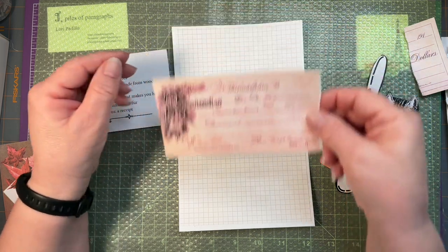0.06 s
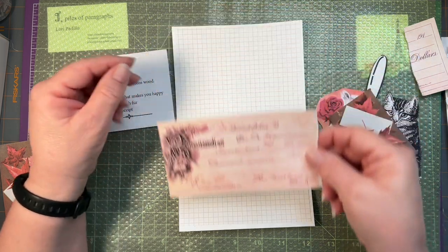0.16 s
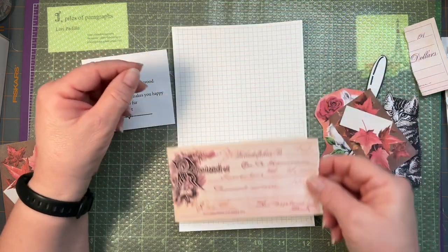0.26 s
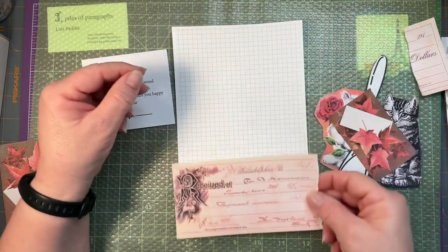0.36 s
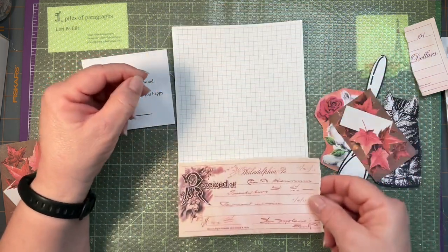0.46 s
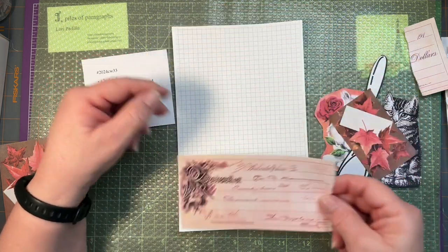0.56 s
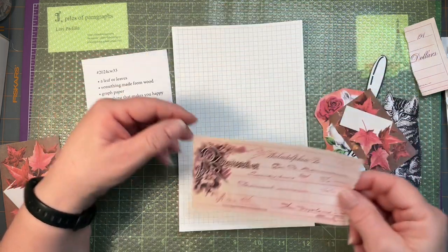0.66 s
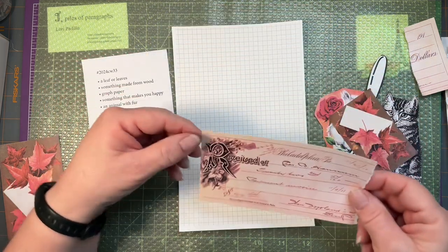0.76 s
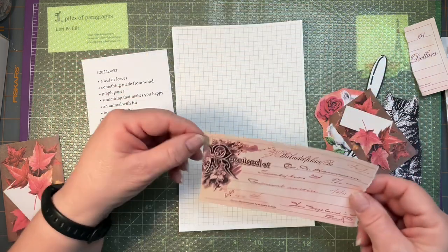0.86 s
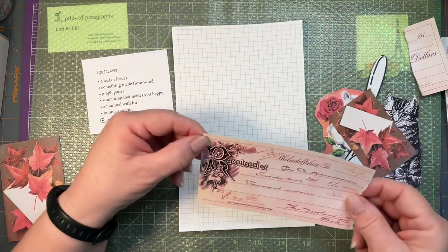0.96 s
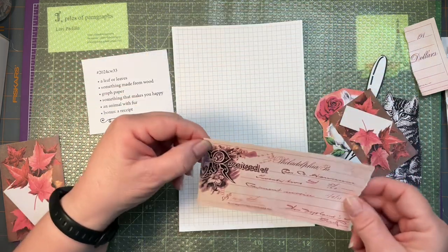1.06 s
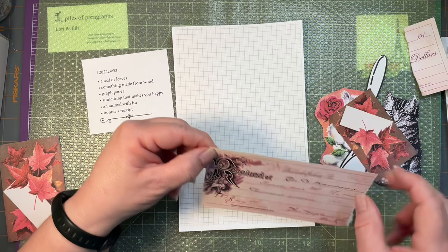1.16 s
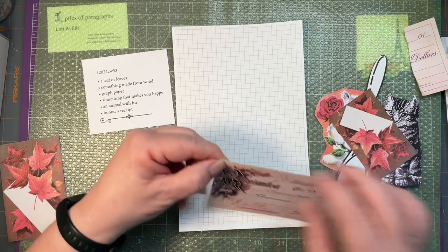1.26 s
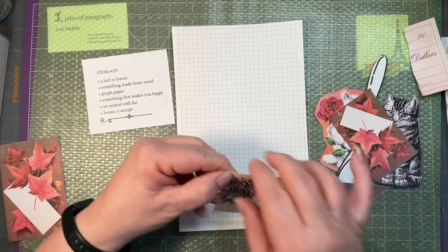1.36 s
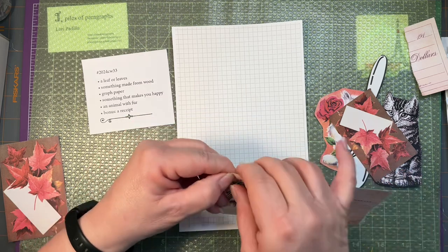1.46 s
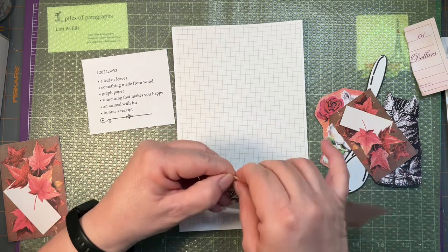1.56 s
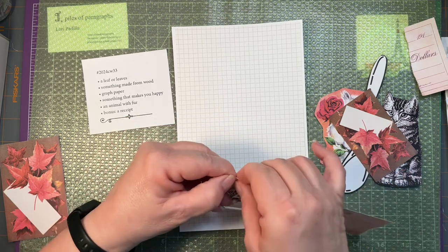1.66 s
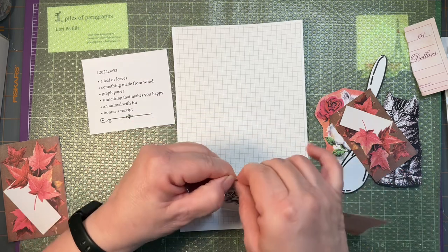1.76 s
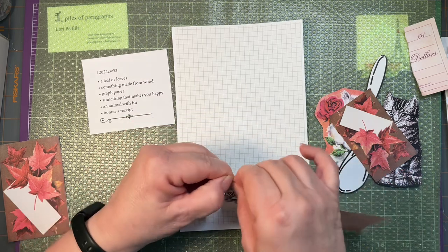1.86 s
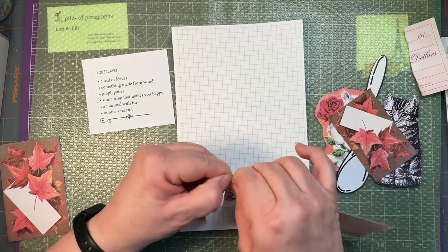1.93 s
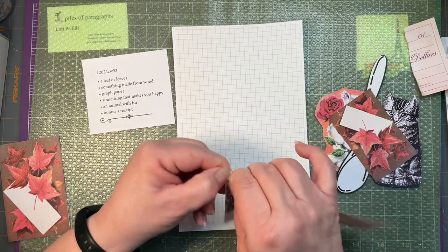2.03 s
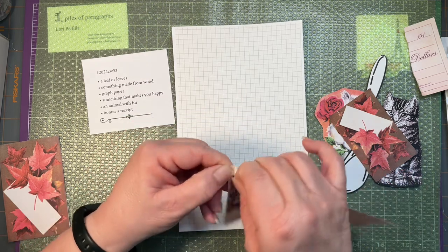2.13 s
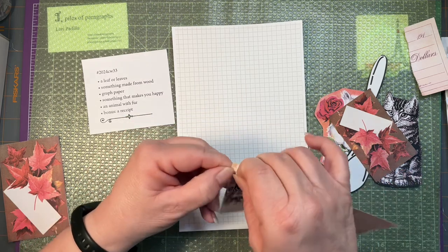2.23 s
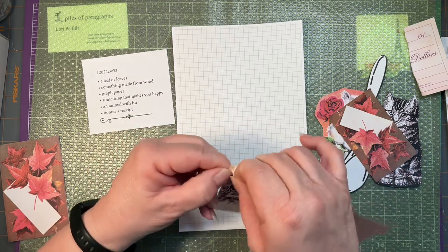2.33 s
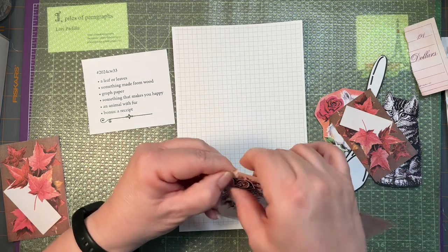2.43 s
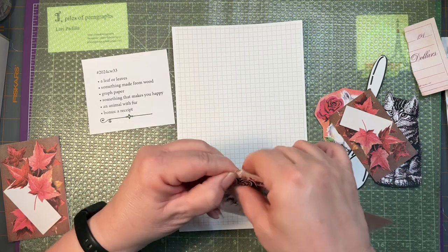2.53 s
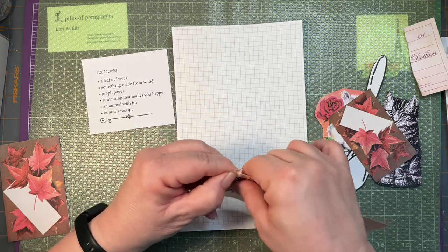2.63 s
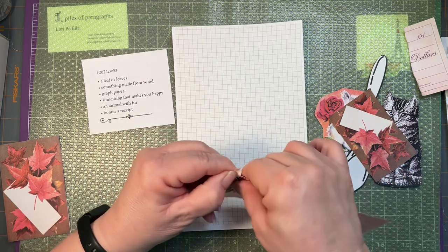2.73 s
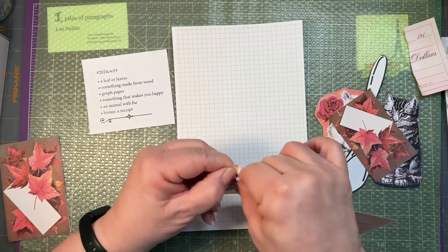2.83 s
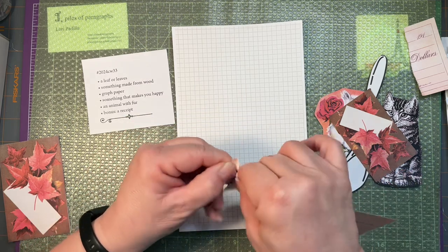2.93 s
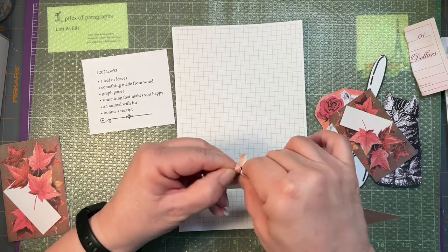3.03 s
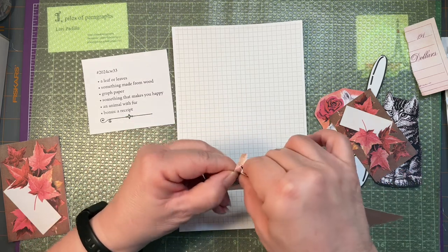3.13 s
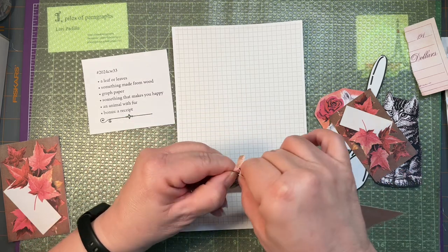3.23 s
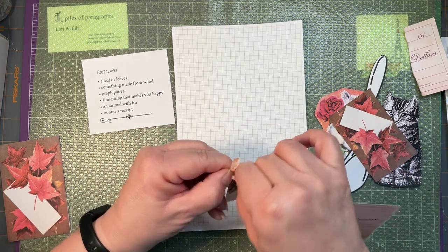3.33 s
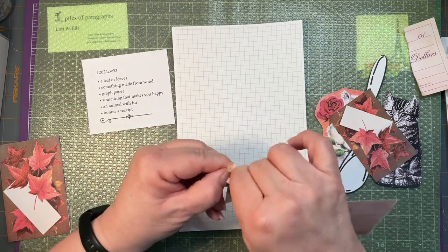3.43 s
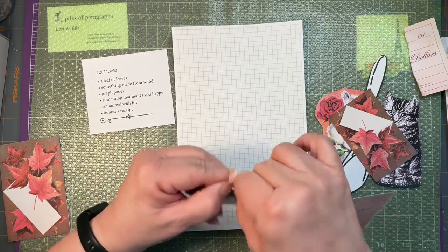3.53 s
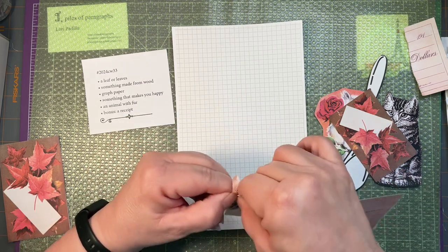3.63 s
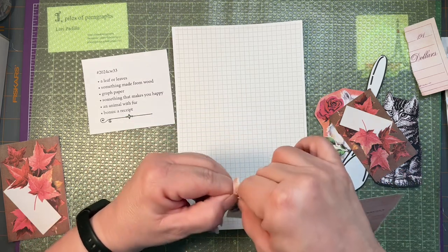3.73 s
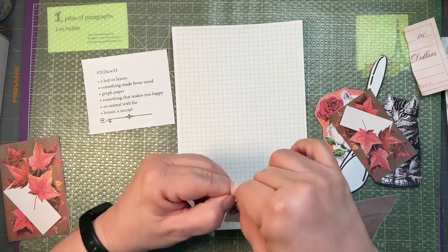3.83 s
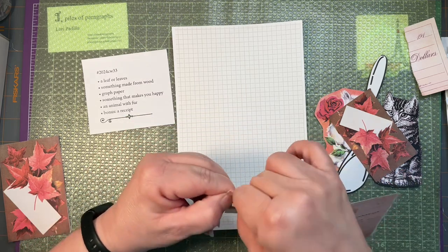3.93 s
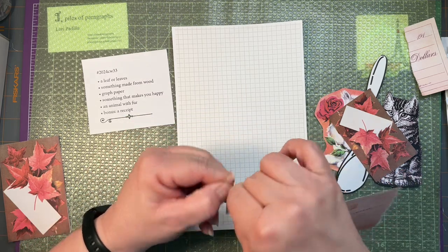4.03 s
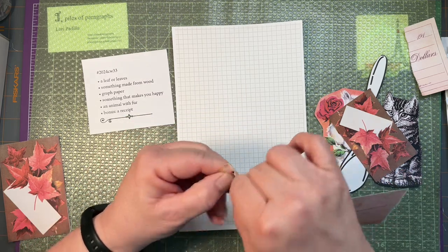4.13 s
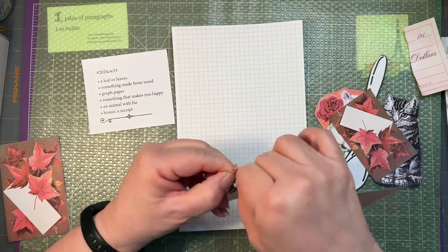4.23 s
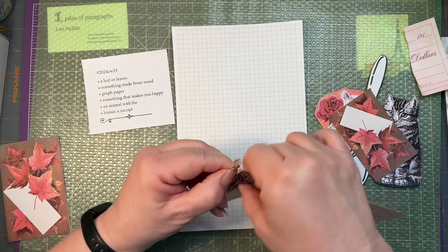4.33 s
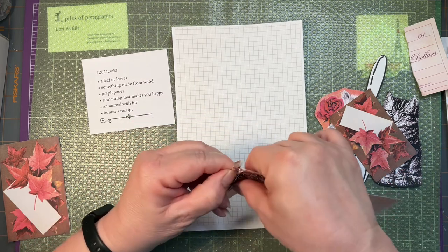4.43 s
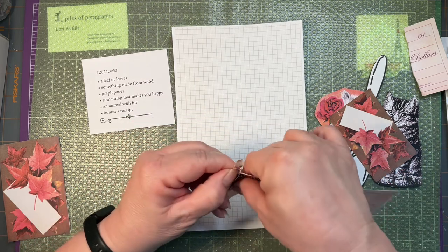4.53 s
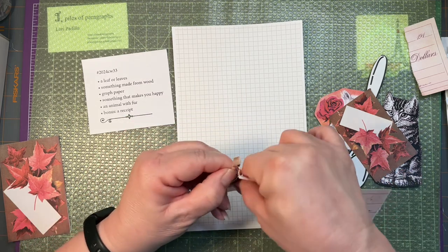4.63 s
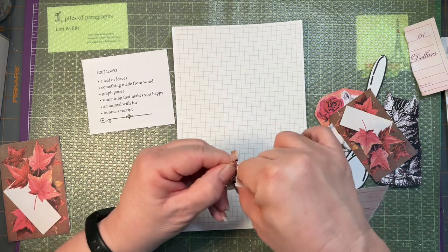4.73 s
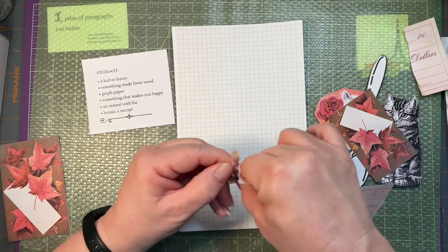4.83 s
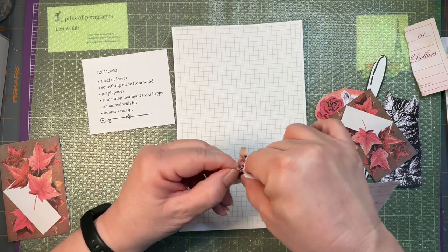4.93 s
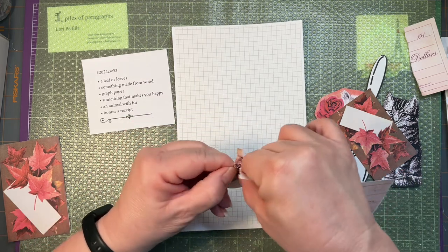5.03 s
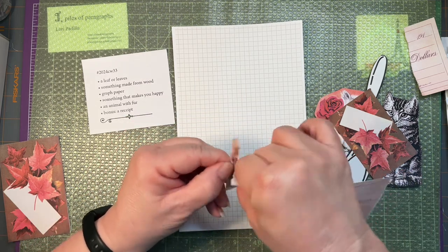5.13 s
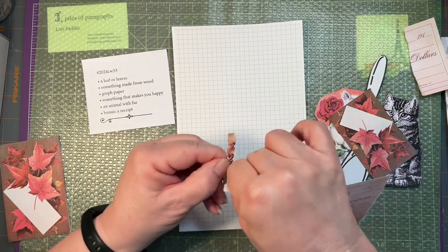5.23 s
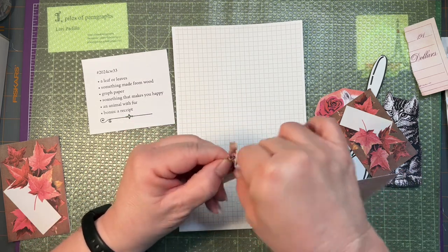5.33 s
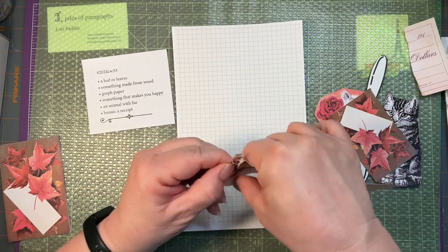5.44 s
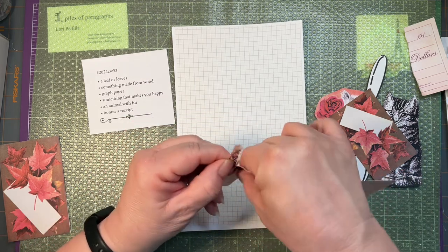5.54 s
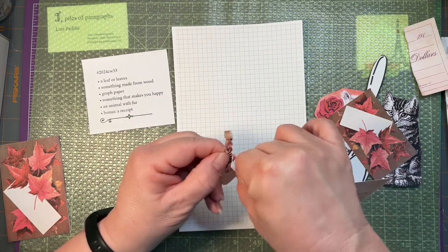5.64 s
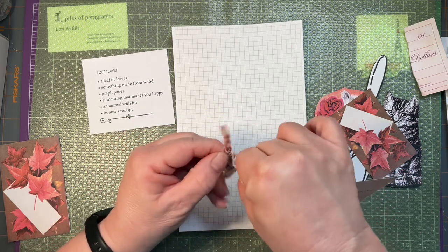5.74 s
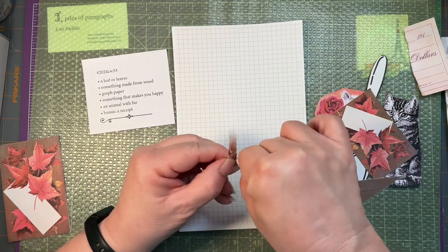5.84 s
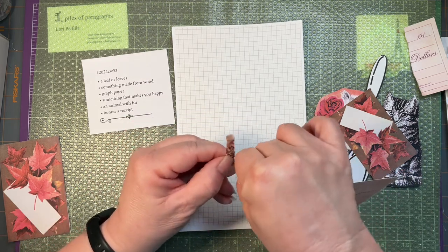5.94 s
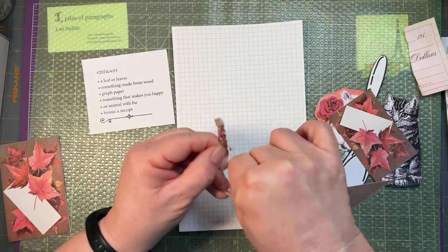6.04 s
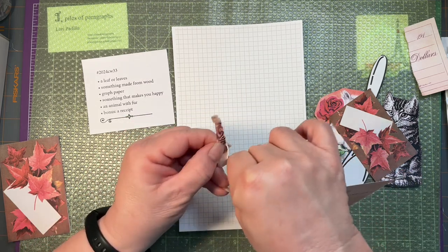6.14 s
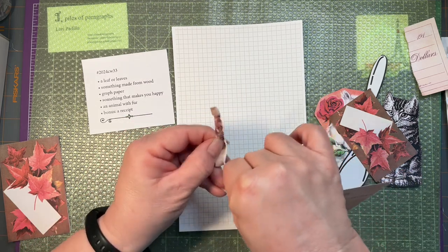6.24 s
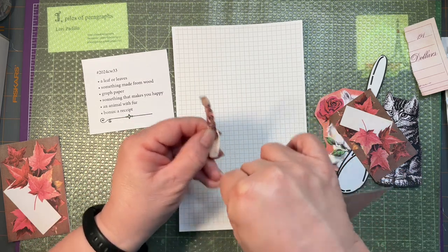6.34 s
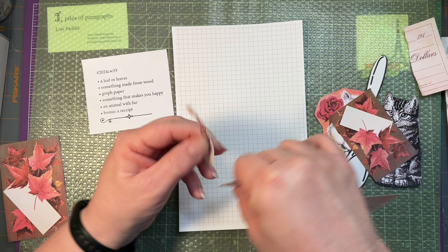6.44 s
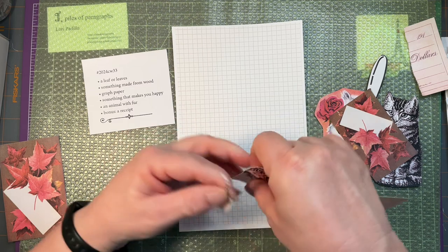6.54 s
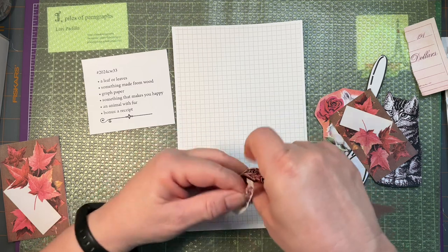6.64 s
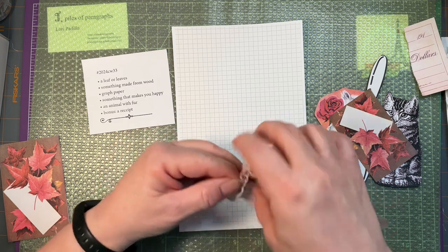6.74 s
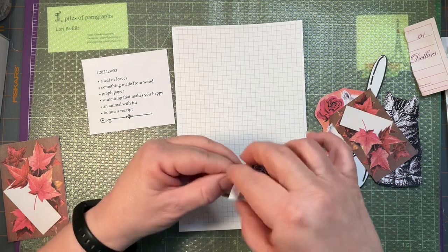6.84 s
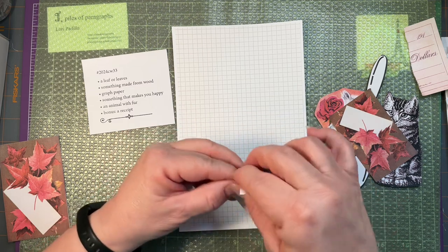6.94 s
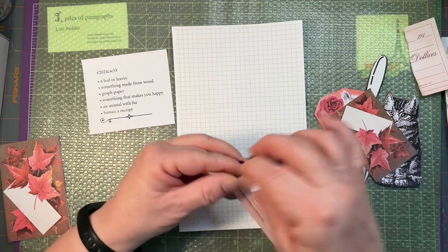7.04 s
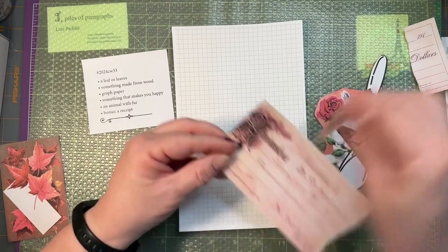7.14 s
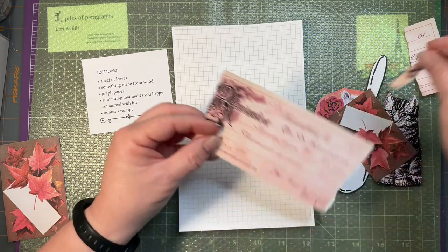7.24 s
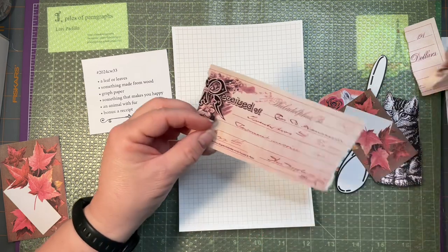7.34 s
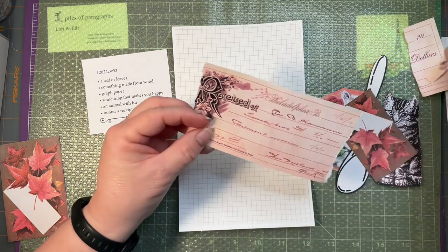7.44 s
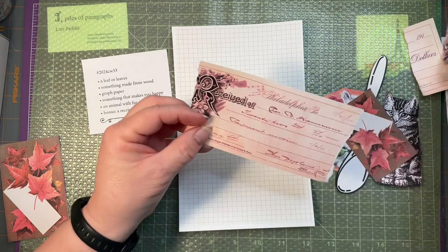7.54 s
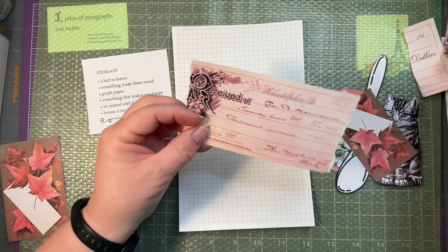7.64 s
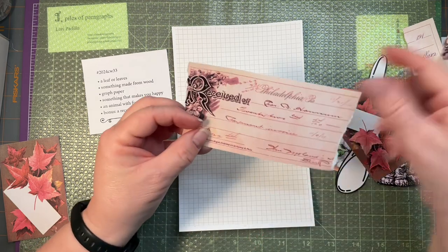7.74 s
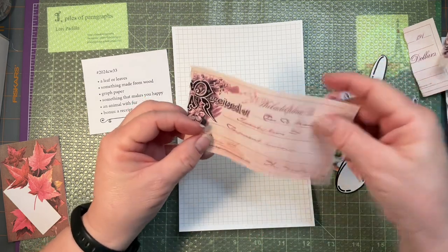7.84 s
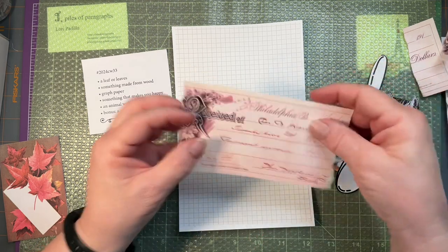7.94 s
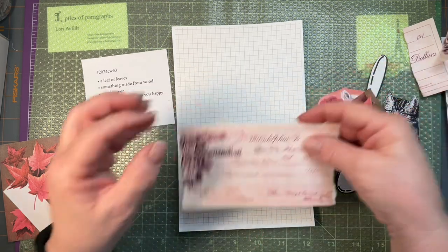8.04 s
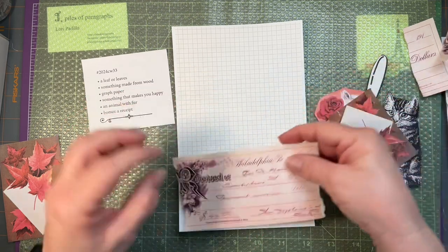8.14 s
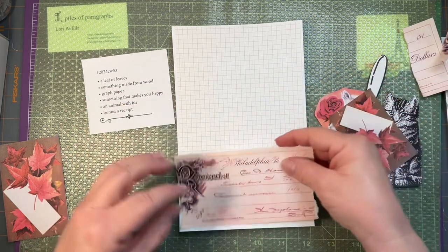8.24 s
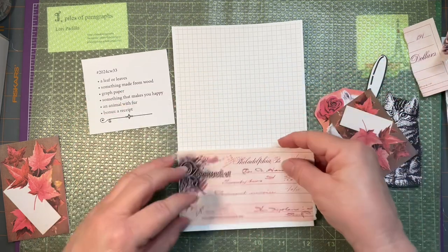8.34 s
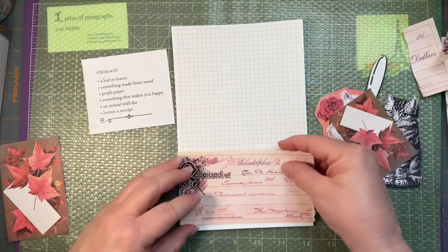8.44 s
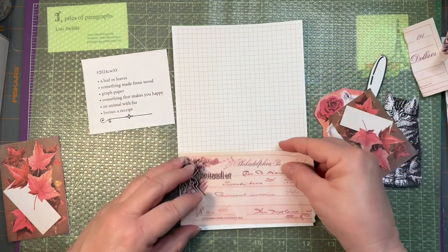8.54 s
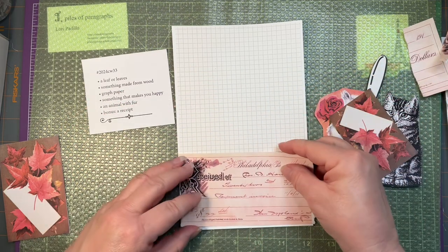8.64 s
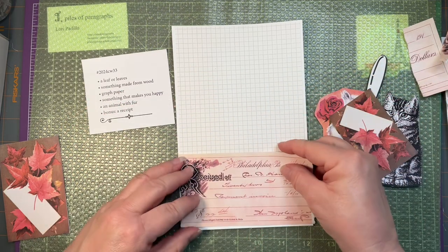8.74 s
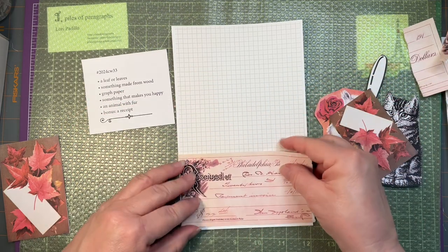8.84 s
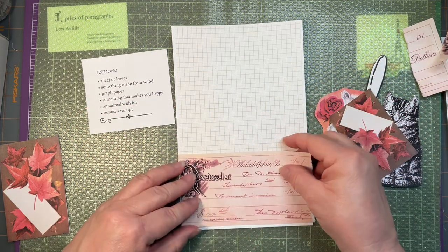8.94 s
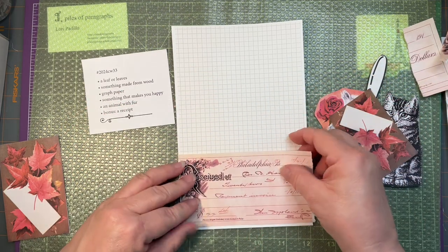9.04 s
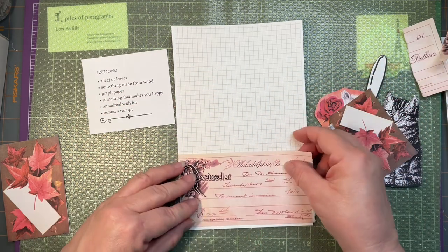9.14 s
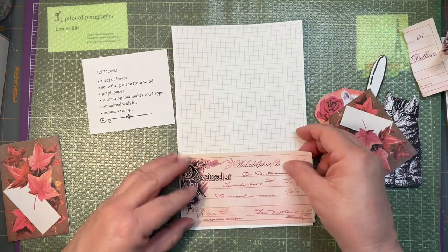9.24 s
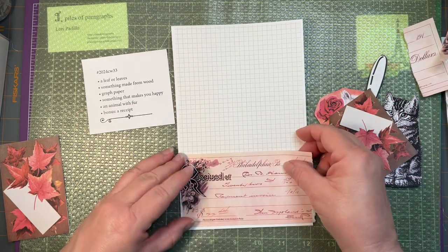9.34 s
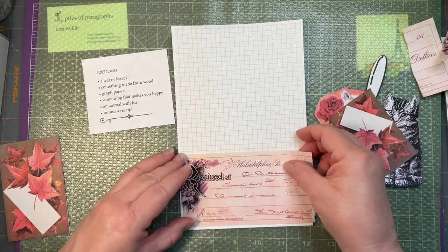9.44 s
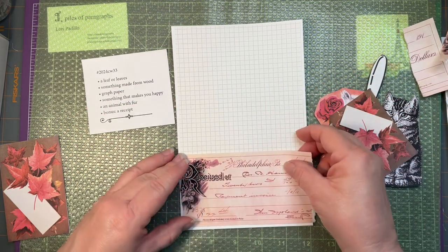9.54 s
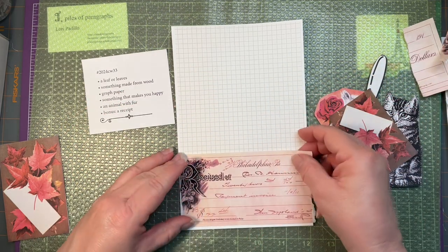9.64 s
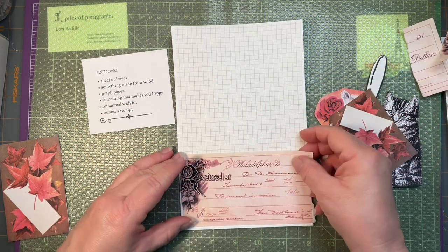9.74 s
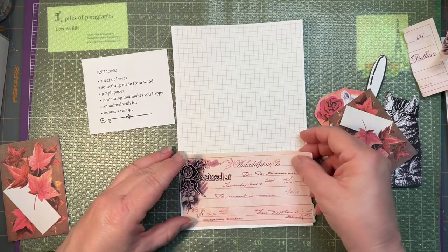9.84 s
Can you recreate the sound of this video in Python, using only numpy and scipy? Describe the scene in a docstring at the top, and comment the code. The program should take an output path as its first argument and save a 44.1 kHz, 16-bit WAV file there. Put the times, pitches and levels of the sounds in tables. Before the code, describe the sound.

Paper is torn by hand in short, crackling rips, then rustles as it is laid down, over a faint room hum.

```python
"""Tearing paper at a craft table

Close to the microphone, a little above the table, a slip of paper is torn by hand in short pulls,
then laid down and slid into place. Fibres break in clumps of tiny clicks, creases snap, skin and
paper rub; all of it rings briefly in the sheet's modes. Behind it, somewhere in the quiet room,
two motors hum out of step."""
import sys
import numpy as np
from scipy import signal
from scipy.fft import rfft, irfft
from scipy.io import wavfile

SR = 44100
rng = np.random.default_rng(int(sys.argv[2]) if len(sys.argv) > 2 else 0)


def generate_wav(sig):
    """Save sig (samples, or channels by samples) to the path in sys.argv[1] as 16-bit PCM at SR."""
    pcm = np.round(np.clip(np.atleast_2d(sig).T, -1, 1) * 32767).astype(np.int16)
    wavfile.write(sys.argv[1], SR, pcm)


N = 436149

# Each pull, rub or slide: (start [s], length [s], crackle at start [dB], crackle at end [dB],
# flexing over crackle [dB], finest fibres over crackle [dB], pitch of the patch between the fingers [Hz])
HAND_STROKES = [(0.0, 0.22, -73.5, -82, -4, 5, 7200), (0.16, 0.13, -71.5, -82, 3, -4, 2000),
                (0.313, 0.047, -60, -73, -3, 0, 1840), (0.371, 0.1, -70, -67, -8, -4.5, 2100),
                (0.497, 0.041, -68, -66, -7, -7, 2030), (0.552, .05, -56, -73, -5, -3.5, 2020),
                (0.7, 0.063, -90.5, -86, -8, 5, 8000), (0.767, .008, -64, -75, 7, -6, 2500),
                (0.94, 0.099, -82, -81, 3, -1, 8000), (1.067, 0.06, -62.5, -65, 2.5, 0, 2400),
                (1.358, 0.028, -66, -83, 2.5, -6, 2900), (1.449, 0.16, -64.5, -73.5, 0, -8, 2720),
                (1.633, 0.018, -50, -54.5, 1, -9, 2200), (1.673, 0.016, -67, -61.5, 3, -12, 5000),
                (1.716, 0.056, -60, -65.5, 5.5, -11, 2270), (1.793, 0.055, -68, -65, -4, -12, 2470),
                (1.866, 0.12, -50, -47, -1, -3.5, 2780), (2.014, 0.074, -64, -59.5, 11, 1, 2130),
                (2.133, 0.18, -56.5, -72.5, -3.5, -9, 2100), (2.367, 0.068, -64, -57, -1.5, 1, 3660),
                (2.488, 0.027, -74, -66.5, 0.5, -5, 2540), (2.592, 0.083, -60, -62.5, 4, -1, 1920),
                (2.698, 0.08, -73, -62, 0, 3, 4900), (2.772, .008, -44.5, -46, -7.5, 3, 5100),
                (2.806, 0.098, -52.5, -51.5, -8.5, 2, 5950), (2.923, 0.0066, -50, -43, -11, 1, 6100),
                (2.966, 0.26, -61.5, -66.5, -9, 0, 6500), (3.309, 0.14, -65.5, -63.5, 3, -5, 2760),
                (3.53, 0.059, -57, -62.5, -2, -8.5, 2260), (3.638, 0.044, -68, -64.5, -7, -7, 3840),
                (3.869, 0.064, -76, -46, -3, 0, 3000), (3.98, 0.023, -60, -58, -12, -5, 2700),
                (4.013, 0.11, -51, -58.5, -1, -4, 2550), (4.153, 0.04, -46.5, -49, -3.5, -5, 1400),
                (4.21, .035, -67, -66, -5, -8, 2800), (4.26, .066, -54, -64, -10.5, -3, 2220),
                (4.33, 0.074, -51, -63.5, -3, 0.5, 4580), (4.422, 0.11, -63, -59, -3, -5, 4960),
                (4.565, 0.072, -54, -46.5, -2, -3.5, 1450), (4.654, 0.065, -56.5, -41, -12, 7, 6100),
                (4.718, 0.029, -50, -46.5, -10.5, 3, 3680), (4.773, 0.061, -67, -73, -1.5, -4, 1990),
                (4.842, 0.11, -61, -59, -8.5, 3, 5100), (4.97, 0.071, -71, -77, -12, 1.5, 6000),
                (5.098, 0.068, -73, -34.5, -8.5, -0.5, 4450), (5.177, .03, -37.5, -58.5, -22, -1, 4540),
                (5.263, 0.056, -64.5, -58.5, -3, -0.5, 2700), (5.342, 0.047, -54, -52.5, -6, -3, 2500),
                (5.398, 0.096, -50.5, -63, -3.5, -9, 2430), (5.53, 0.037, -55, -55.5, 1, -3, 2500),
                (5.587, 0.07, -45.5, -39, -10.5, -0.5, 7500), (5.74, 0.12, -62, -58, -7, -0.5, 1860),
                (5.942, 0.063, -68.5, -39.5, -12, 6, 6430), (6.013, 0.057, -40, -43.5, -5, 0.5, 6150),
                (6.175, .012, -57, -59, -2, 0.5, 5930), (6.198, 0.056, -47, -37, -1, 2.5, 5830),
                (6.271, .04, -38.5, -43, 1.5, 1, 5800), (6.316, 0.016, -32.5, -45, -6, -10, 5960),
                (6.341, 0.021, -70, -47, -21, 7.5, 6000), (6.414, 0.017, -51, -56, -17, -18, 5400),
                (6.442, 0.15, -58.5, -58.5, -6.5, -2, 4600), (6.612, 0.074, -59, -55.5, -5, -2.5, 2290),
                (6.705, 0.062, -59, -59.5, 7.5, 1.5, 1400), (6.797, 0.15, -65, -72, 2, -3.5, 1440),
                (6.904, 0.085, -66.5, -67, 3, -2.5, 1420), (6.985, 0.088, -52.5, -67, -4.5, -3.5, 1440),
                (7.085, 0.011, -44, -67.5, -4, -7, 3670), (7.099, 0.049, -71.5, -81.5, 22, 3, 980),
                (7.157, 0.044, -71, -76, -8, 6, 2200), (7.224, 0.039, -70, -69, -6, 0.5, 3500),
                (7.395, 0.038, -62.5, -68.5, -15, -2.5, 3850), (7.498, 0.019, -68, -78.5, -25, 3, 4100),
                (7.636, 0.01, -61.5, -72, -20, -7.5, 4400), (7.794, 0.038, -58.5, -52.5, 4, -10, 2600),
                (7.837, 0.011, -36.5, -50, 10, -21, 2630), (7.869, 0.043, -51, -45.5, -10, -5, 2650),
                (7.937, .008, -52, -49, 11, -12, 2650), (7.955, 0.0096, -50, -56, 7, -11, 2620),
                (7.995, 0.14, -64, -81, -1.5, -0.5, 600), (8.139, 0.13, -62.5, -65.5, 0, -5.5, 2400),
                (8.311, 0.024, -64.5, -55.5, -6.5, -8, 3700), (8.37, 0.1, -59, -55, -13, -9, 4780),
                (8.528, 0.028, -58, -61.5, -24, -10, 3630), (8.603, 0.096, -53, -74, -13.5, -5, 3650),
                (8.732, 0.016, -60.5, -63.5, -12, -8, 3900), (8.79, .1, -65.5, -53.5, -16, -3.5, 3540),
                (8.903, .12, -56.5, -63.5, -17, -3, 3600), (9.046, 0.082, -54, -56, -19, 0, 3600),
                (9.182, 0.07, -60.5, -70.5, -16, 3, 3630), (9.302, 0.0049, -70, -65, -17, 1, 4600),
                (9.548, 0.097, -57, -59.5, -30.5, 2, 6070), (9.664, 0.039, -60.5, -58.5, -33, -3.5, 6100),
                (9.739, 0.03, -70.5, -79.5, -20, 4, 7000)]
# Creases snapping: (time [s], level [dB], flexing over that level [dB], pitch of the popping patch [Hz])
CREASE_SNAPS = [(0.31, -41.5, -4, 1710), (0.52, -50, -6, 1910), (1.491, -44.5, -7, 2370),
                (1.523, -51, -17, 1000), (1.585, -42.5, -8.5, 880), (1.599, -50, -3, 1500),
                (1.63, -41, -10.5, 2250), (1.657, -36.5, -4.5, 875), (1.711, -36.5, -10, 830),
                (1.81, -46.5, -2, 2300), (1.83, -39, -2.5, 2280), (1.86, -38, -17, 790),
                (1.874, -27, -15.5, 845), (2.04, -30, -14, 2100), (2.067, -47.5, 13, 475),
                (2.242, -37, -9.5, 2220), (2.434, -30.5, -9.5, 1034), (2.727, -38.5, -20, 1120),
                (2.75, -38, -17, 960), (2.772, -25.5, -16.5, 855), (2.806, -25, -20, 930),
                (2.82, -21, -14, 2210), (2.854, -25.5, -14.5, 2190), (2.93, -25, -34, 2520),
                (2.979, -32.5, -18.5, 910), (3.15, -38, -19.5, 1140), (3.406, -38.5, -4.5, 880),
                (3.418, -24.5, -15.5, 780), (3.737, -58, 3, 1930), (3.801, -45.5, -32, 2520),
                (3.909, -29.5, -10.5, 2030), (3.999, -34, -27, 2020), (4.019, -29, -16, 880),
                (4.096, -29, -15, 1600), (4.16, -27.5, -15, 2110), (4.313, -30, -2.5, 805),
                (4.573, -41, -9, 1600), (4.624, -31.5, -7, 1490), (4.632, -34, -8, 1430),
                (4.672, -24, -22, 1870), (4.687, -25.5, -26.5, 1970), (4.697, -28, -26, 2300),
                (4.708, -16.5, -42, 2250), (4.724, -30.5, -10.5, 1550), (4.738, -25, -25, 2180),
                (4.846, -29.5, -20, 2000), (5.131, -29, -27, 1960), (5.16, -24.5, -3, 914),
                (5.4, -26, -8, 1100), (5.536, -42, -27, 1000), (5.586, -24.5, -19.5, 1090),
                (5.759, -19.5, -15.5, 1296), (5.873, -36, -33, 2510), (5.894, -40.5, -26, 2520),
                (5.971, -42, -13, 1020), (5.982, -31.5, -18, 814), (6.016, -24, -21, 810),
                (6.192, -34, -14, 1130), (6.276, -14, -17, 930), (6.317, -4.5, -13, 545),
                (6.357, -12, -12, 797), (6.419, -25.5, -15.5, 2080), (6.472, -41, -7.5, 1090),
                (6.71, -40, 7, 1000), (6.776, -32, -12, 1670), (6.822, -51.5, 12, 1390),
                (6.896, -56.5, 22.5, 1040), (7.091, -44, 8.5, 1260), (7.398, -47, -15.5, 1940),
                (7.499, -38.5, -41, 2600), (7.787, -39.5, -19, 814), (7.802, -37.5, 3, 897),
                (7.807, -32.5, -2.5, 2700), (7.835, -8, -11.5, 720), (7.89, -32, -9.5, 1160),
                (7.918, -29, -8, 1070), (7.942, -30.5, 6.5, 927), (7.96, -28.5, -0.5, 950),
                (7.968, -34, 6, 1065), (8.525, -45, -30, 2530), (8.608, -32.5, -19, 2580),
                (8.816, -30, -16.5, 2450), (9.115, -31, -27, 2610), (9.306, -42, -18, 2310)]
# The sheet's colour while torn in the hands: (frequency [Hz], relative density [dB])
HELD_SPECTRUM = [(120, -43), (200, -14), (446, -2), (575, -4), (653, -5), (1110, 1.5), (1590, -5),
                 (1910, -3.5), (5110, -4), (5700, -8.5), (6240, -2), (9140, -14), (15500, -19)]
# Its colour while slid flat on the table: (frequency [Hz], relative density [dB])
FLAT_SPECTRUM = [(880, -22.5), (1500, -22.5), (2350, 0.5), (2830, -6), (3510, 5), (4230, -6), (5290, 4.5),
                 (5670, -21), (6500, 7), (7160, -9), (8540, -8.5), (10500, -17), (15500, -18.5)]
# The air of the room: (frequency [Hz], relative density [dB])
AIR_SPECTRUM = [(40, -8), (60, 2.5), (120, 5.5), (200, -2.5), (300, -16.5), (500, -21), (1300, -28),
                (3000, -30.5), (6500, -35), (8200, -33), (9500, -42), (15800, -37.5)]
# The motors' tones: (frequency [Hz])
MOTOR_HZ = [55.25, 58.775, 110.5, 114.03, 117.55, 119.96, 169.29, 176.33]
# The same tones ahead of the microphone's bass cut: (rms level [dB])
MOTOR_DB = [-66.5, -67.5, -82.5, -79, -67, -79.5, -80, -79]

LAID_DOWN_S = 8.1
FLEX_TOP_HZ, FINE_FROM_HZ = 2100, 7800   # three zones: flexing, crackle, finest fibres
PATCH_DB, PATCH_OCTAVES = 7, 0.33   # the free patch rings loudest: lift and half width
CRACK_DECAY_S, FLAP_DECAY_S = 0.003, 0.0027


def from_db(db):
    """Decibels to gain."""
    return 10 ** (np.asarray(db) / 20)


def unit_rms(x):
    """Scale to unit rms."""
    return x / np.sqrt(np.mean(x ** 2) + 1e-20)


def level_at(spectrum, hz):
    """Read a spectrum's dB on a log-frequency axis."""
    points_hz, points_db = np.transpose(spectrum)
    return np.interp(np.log(hz), np.log(points_hz), points_db)


def drift(rate_hz):
    """A random wander of rms 1: coarse noise through a double one-pole low-pass."""
    step = 40
    pole = np.exp(-2 * np.pi * rate_hz * step / SR)
    noise = rng.standard_normal(N // step + 1002)
    slow = signal.lfilter([1], [1, -2 * pole, pole * pole], noise)[1000:]
    return np.interp(np.arange(N) / step, np.arange(len(slow)), unit_rms(slow))


def mode(x, hz, width_hz):
    """A resonance that turns unit white noise into unit rms."""
    radius, angle = np.exp(-np.pi * width_hz / SR), 2 * np.pi * hz / SR
    gain = np.sqrt((1 - radius ** 2) / 2)
    return signal.lfilter([gain, 0, -gain], [1, -2 * radius * np.cos(angle), radius ** 2], x)


def hand_strokes(attack_db_per_s=2499, release_db_per_s=753):
    """Strokes set in fast, run and let go; gives crackle, flexing and fine dB and the patch's octave."""
    t = np.arange(N // 32 + 2) * 32 / SR
    start_s, length_s, first_db, last_db, flex_db, fine_db, hz = np.transpose(HAND_STROKES)[:, :, None]
    db = first_db + (last_db - first_db) * np.clip((t - start_s) / length_s, 0, 1)
    db -= attack_db_per_s * np.maximum(start_s - t, 0)
    db -= release_db_per_s * np.maximum(t - start_s - length_s, 0)
    power = from_db(2 * np.maximum(db, -150))   # overlapping strokes add in power
    levels = [10 * np.log10(np.sum(power * from_db(2 * over), axis=0)) for over in (0, flex_db, fine_db)]
    patch_octave = np.sum(power * np.log2(hz), axis=0) / np.sum(power, axis=0)
    return [np.interp(np.arange(N) / SR, t, curve) for curve in levels + [patch_octave]]


def fibres(per_s, spread_db, clump_db):
    """Breaking fibres: random clicks of very uneven size that come in clumps; rms 1."""
    sizes = from_db(spread_db * np.minimum(rng.exponential(1, N), 4))
    signs = rng.choice([-1, 1], N)
    breaking = rng.random(N) < per_s / SR
    return unit_rms(sizes * signs * breaking * from_db(clump_db * drift(90)))


def sheet_modes(textures, zone_forces, zone_clicks, patch_octave, grip):
    """The sheet rings in fifty short modes, which wax and wane as the grip bends it."""
    in_hand = np.arange(N) / SR < LAID_DOWN_S
    modes_hz = np.geomspace(240, 15600, 50)
    zones = (modes_hz > FLEX_TOP_HZ).astype(int) + (modes_hz > FINE_FROM_HZ)
    # the modes of a zone share its power according to the sheet's colour
    powers = [from_db(2 * level_at(sp, modes_hz)) * modes_hz for sp in (HELD_SPECTRUM, FLAT_SPECTRUM)]
    held_share, flat_share = (np.sqrt(power / np.bincount(zones, power)[zones]) for power in powers)
    ringing = np.zeros(N)
    for k, (hz, zone) in enumerate(zip(modes_hz, zones)):
        share = np.where(in_hand, held_share[k], flat_share[k])
        lift_db = PATCH_DB * np.maximum(1 - np.abs(np.log2(hz) - patch_octave) / PATCH_OCTAVES, 0)
        bending = from_db(lift_db + 3.48 * grip * drift(12.9) - 3.5)
        drive = textures[k % 3] * zone_forces[zone] + zone_clicks[zone]
        ringing += (-1) ** k * mode(drive * share * bending, hz, width_hz=30 + 0.044 * hz)
    return ringing


def crease_snaps():
    """A crease gives a sharp click, a burst of force (crack, flap) and a hollow pop at its patch's pitch."""
    span = 2000
    t = np.arange(span) / SR
    swing = (1 - np.exp(-t / 0.00076)) * np.exp(-t / 0.0039)
    click, crack, flap, pops = np.zeros((4, N + span))
    for time_s, db, flex_db, hz in CREASE_SNAPS:
        i = round(time_s * SR)
        click[i] += from_db(db + 1)
        crack[i:i + span] += from_db(db - 16.5) * np.exp(-t / CRACK_DECAY_S)
        flap[i:i + span] += from_db(db + flex_db - 2) * np.exp(-t / FLAP_DECAY_S)
        pops[i:i + span] += from_db(db + flex_db) * swing * np.sin(2 * np.pi * hz * t)
    return click[:N], crack[:N], flap[:N], pops[:N]


def paper():
    """The slip heard close up: breaking fibres, rubbing and snaps drive the sheet's modes."""
    crackle_db, flex_db, fine_db, patch_octave = hand_strokes()
    pull = np.clip((crackle_db + 68.5) / 22, 0, 1)
    grip = np.where(np.arange(N) / SR < LAID_DOWN_S, 1, 0.45)
    # a light touch sticks and slips, so it comes in crinkles; a hard pull runs on
    crinkle = from_db(grip * (1 - pull) * (2.05 * drift(41) - 0.5))
    crackle, flex, fine = (crinkle * from_db(db) for db in (crackle_db, flex_db, fine_db))
    click, crack, flap, pops = crease_snaps()
    zone_forces = [flex + flap, crackle + crack, fine + from_db(-5.5) * crack]
    zone_clicks = [0, click, from_db(-14) * click]
    fibre_share = grip * (0.42 + 0.34 * pull)
    breaks = np.sqrt(fibre_share) * fibres(per_s=2200, spread_db=4, clump_db=4)
    rubbing = np.sqrt(1 - fibre_share) * rng.standard_normal((3, N))
    textures = breaks + rubbing
    air_puff = from_db(-23.5) * mode(flap * (1 + 3.3 * textures[0]), hz=290, width_hz=300)
    crease_tick = from_db(-23.5) * mode(click, hz=4000, width_hz=7000)
    return pops + air_puff + crease_tick + sheet_modes(textures, zone_forces, zone_clicks, patch_octave, grip)


def reflections(x, t60_s=0.068, level_db=-15, top_hz=5000):
    """Table and walls return a short dull tail, 4 ms behind the direct sound."""
    t = np.arange(SR // 2) / SR
    tail = rng.standard_normal(len(t)) * from_db(-60 * t / t60_s) * (t > 0.004)
    tail = signal.sosfilt(signal.butter(1, top_hz, fs=SR, output="sos"), tail)
    tail /= np.sqrt(np.sum(tail ** 2))
    return from_db(level_db) * signal.fftconvolve(x, tail)[:N]


def room_air(level_db=-62.5):
    """Steady air noise all round the microphone, mostly bass."""
    hz = np.maximum(np.fft.rfftfreq(N, 1 / SR), 1)
    spectrum = rfft(rng.standard_normal(N)) * from_db(level_at(AIR_SPECTRUM, hz))
    return from_db(level_db) * unit_rms(irfft(spectrum, N))


def motors(in_step_s=0.283, waver_db=0.26):
    """Two motors off in the room beat against each other; each tone's level wavers a little."""
    t = np.arange(N) / SR - in_step_s
    return sum(from_db(db + waver_db * drift(1.4)) * np.sqrt(2) * np.cos(2 * np.pi * hz * t)
               for hz, db in zip(MOTOR_HZ, MOTOR_DB))


def scene():
    """In mono: the paper up close, its reflections, and the air and motors behind."""
    near = paper()
    return (near + reflections(near) + room_air() + motors())[None]


def record(dry):
    """The microphone drops the bass below 48 Hz; the top is cut steeply at 15.7 kHz."""
    bass_cut = signal.butter(6, 48, "high", fs=SR, output="sos")
    top_cut = signal.ellip(12, 0.5, 75, 15700, fs=SR, output="sos")
    return signal.sosfilt(top_cut, signal.sosfilt(bass_cut, dry))


dry = scene()
out = record(dry)
generate_wav(out)
```